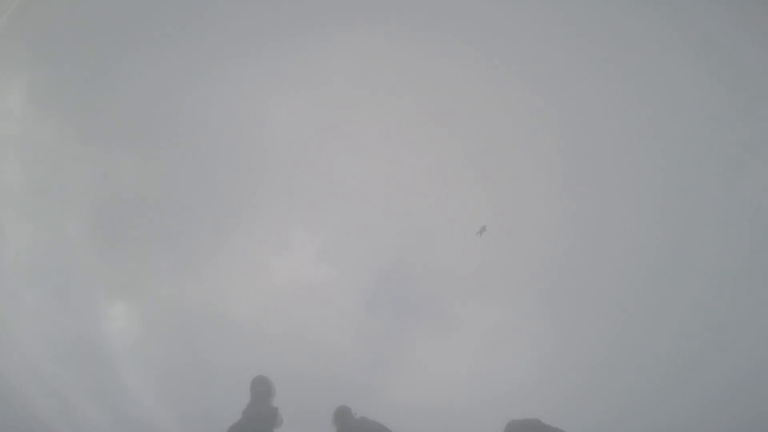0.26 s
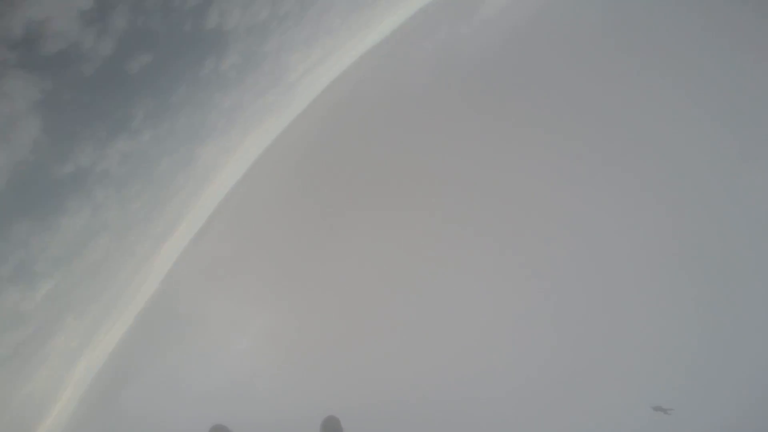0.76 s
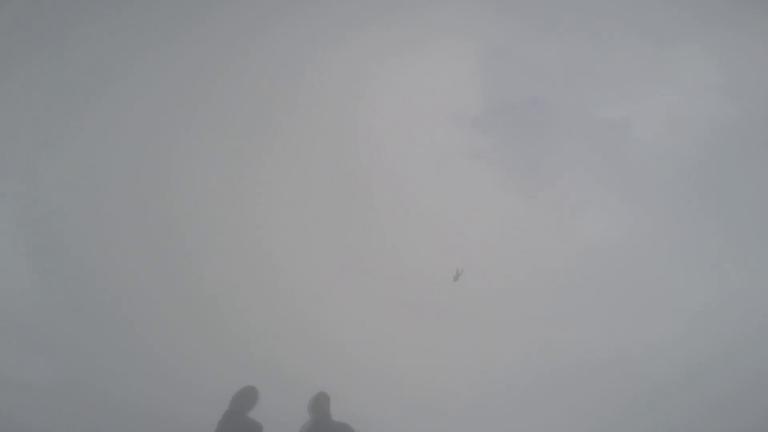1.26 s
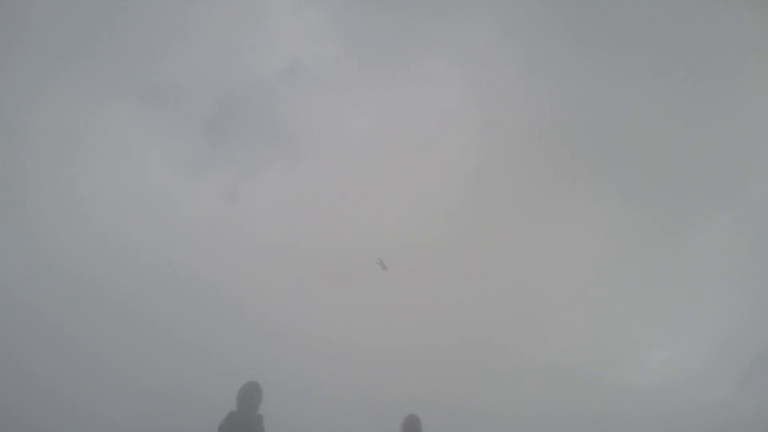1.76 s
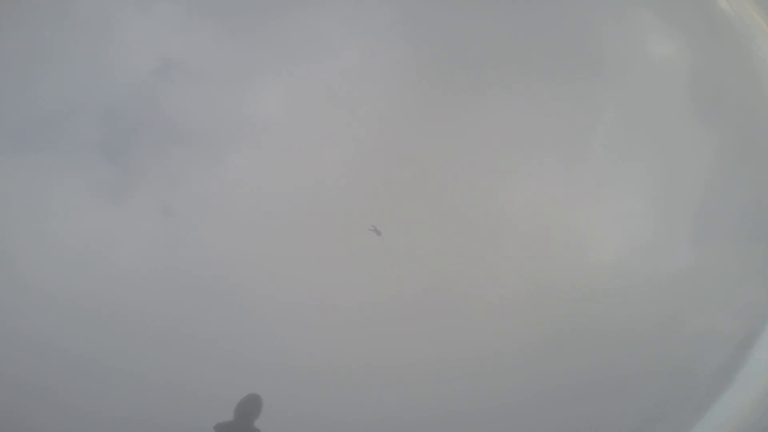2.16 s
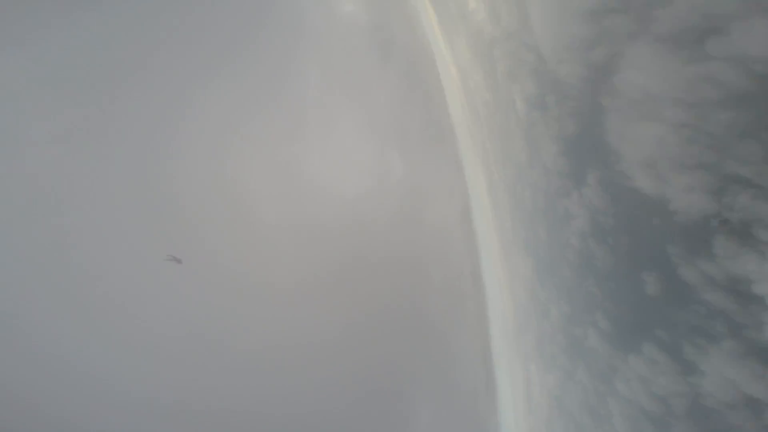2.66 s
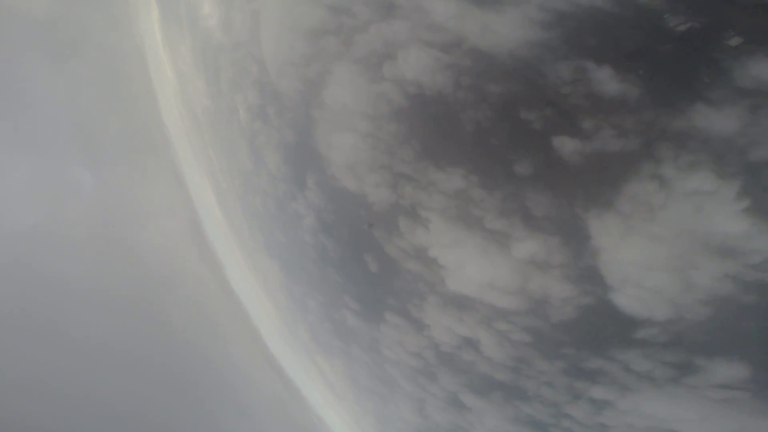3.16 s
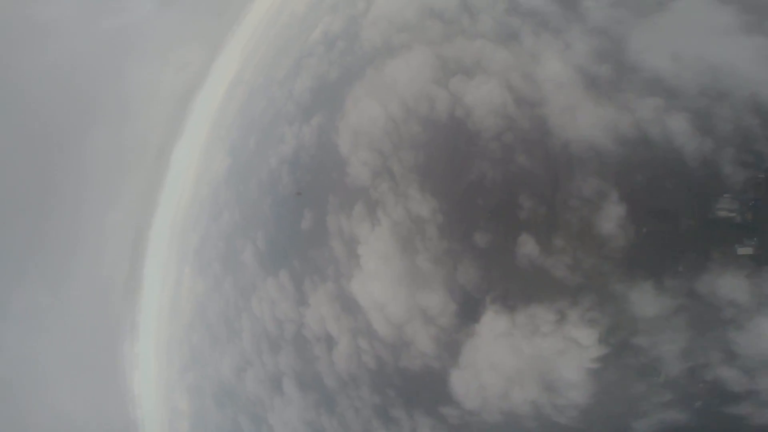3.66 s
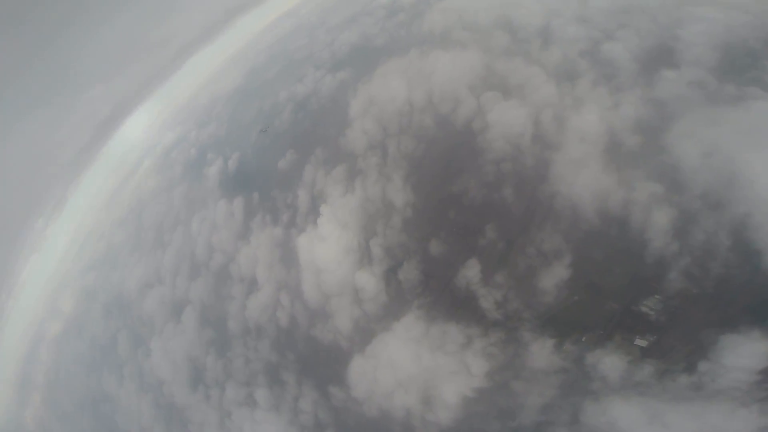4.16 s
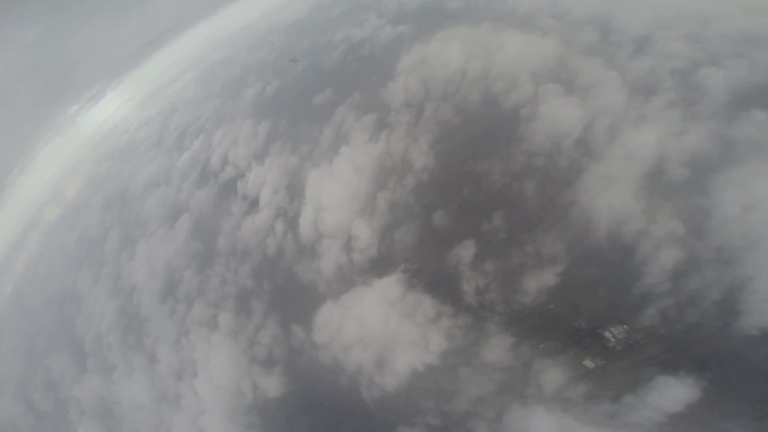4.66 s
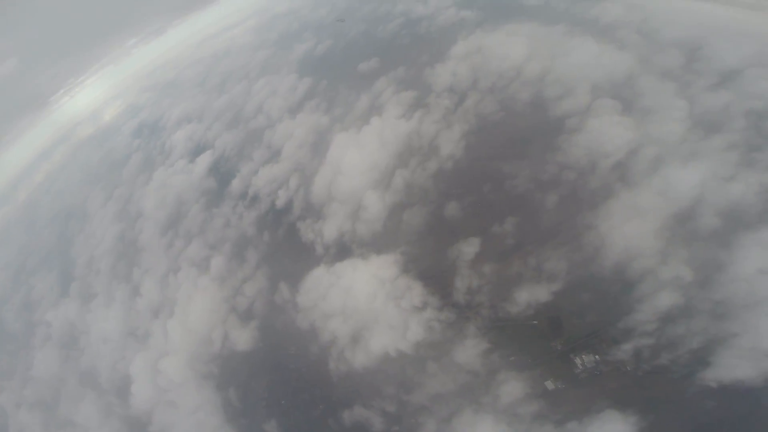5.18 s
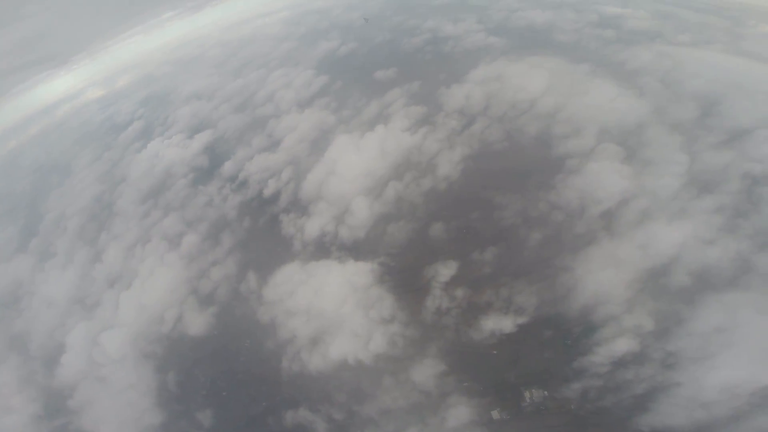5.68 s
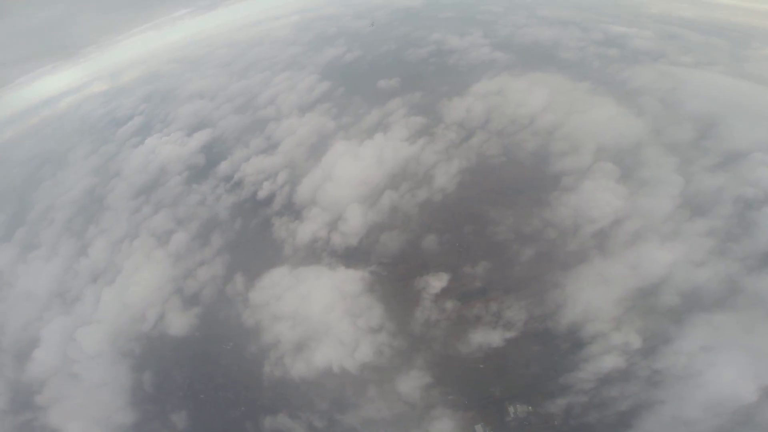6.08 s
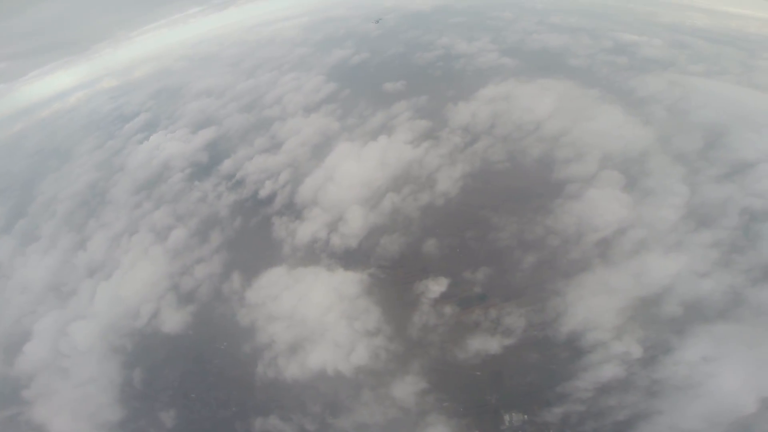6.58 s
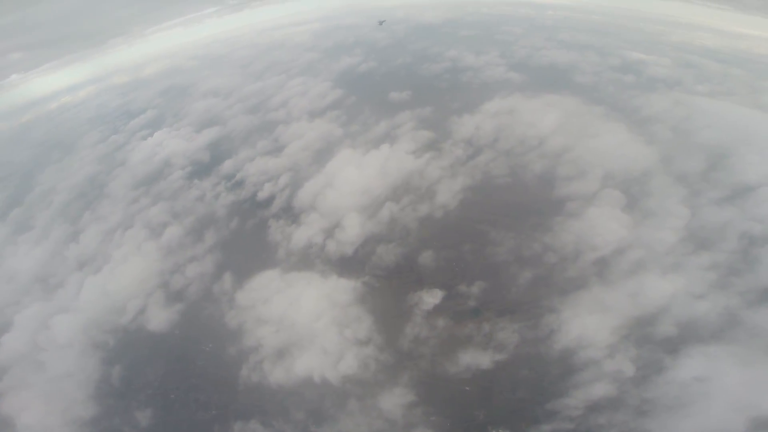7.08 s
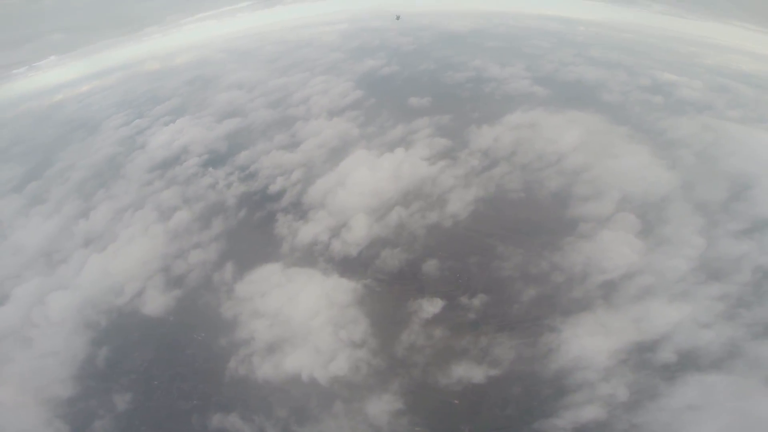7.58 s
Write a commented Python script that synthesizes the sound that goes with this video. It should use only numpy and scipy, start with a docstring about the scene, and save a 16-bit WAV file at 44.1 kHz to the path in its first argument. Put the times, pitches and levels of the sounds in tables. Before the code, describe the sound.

Continuous loud freefall wind, very close and with no echo, the same in both channels. Low eddies buffet the camera housing while the air rings hoarsely around its edges and hisses in short spurts. A thin, wavering whistle flickers early on. A mid-pitched roar surges during a roll, followed by scattered thumps and finally an even, full rush of air.

```python
"""Freefall on a helmet

Wind heard by one microphone in a camera housing on a skydiver's helmet, all of it shaped noise but for
the whistles. Eddies buffet the housing and the airstream rings the gaps at its edges; as the diver rolls
over, a roar sweeps past and a slit whistles faintly, in wavering sine tones. In the stable fall the flow
settles into one broad, even rush of overlapping resonances."""
import sys
import numpy as np
from scipy import signal
from scipy.fft import rfft, irfft, next_fast_len
from scipy.io import wavfile

SR = 44100
rng = np.random.default_rng(int(sys.argv[2]) if len(sys.argv) > 2 else 0)


def to_wav(sig):
    """Store sig (one row per channel, or 1-D mono) as 16-bit WAV at the path in sys.argv[1].

    Samples outside -1..1 are clipped; the rate is SR.
    """
    pcm = np.clip(np.atleast_2d(sig), -1, 1) * 32767
    pcm = np.round(pcm).astype(np.int16)
    wavfile.write(sys.argv[1], SR, pcm.T)  # frames by channels


N = 345289


def undb(db):
    """Decibels to gain."""
    return 10 ** (np.asarray(db) / 20)


def noise(response):
    """Noise of rms 1 with the given amplitude response, a function of frequency."""
    size = next_fast_len(N, real=True)
    hz = np.maximum(np.arange(size // 2 + 1) * SR / size, 1)
    spectrum = rfft(rng.standard_normal(size)) * response(hz)
    x = irfft(spectrum, size)[:N]
    return x / np.std(x)


def turbulence(spectrum):
    """Random pressure with a smooth spectrum that dies away above its last point."""
    f, db = np.transpose(spectrum)

    def response(hz):
        smooth = undb(np.interp(np.log(hz), np.log(f), db))
        return smooth * np.minimum(f[-1] / hz, 1) ** 2
    return noise(response)


def cavities(modes):
    """Air cavities, each blown by its own eddies, so that their powers add."""
    def response(hz):
        power = 0
        for f, width, db in modes:
            detuning = (hz / f - f / hz) * f / (2 * width)
            power = power + (undb(db) / (1 + 2 * detuning ** 2)) ** 2
        return np.sqrt(power)
    return noise(response)


def flutter(rate_hz, depth_db):
    """A gain that wanders at random, mostly slower than the given rate, by an rms depth in dB."""
    return undb(depth_db * noise(lambda hz: 1 / (1 + (hz / rate_hz) ** 4)))


def curves(table):
    """The columns of a curve at every sample."""
    s, *columns = np.transpose(table)
    return [np.interp(np.arange(N) / SR, s, c) for c in columns]


def arch(start, length):
    """Half a sine that rises from 0 to 1 and falls back over one event."""
    progress = (np.arange(N) / SR - start) / length
    on, out = (progress > 0) & (progress < 1), np.zeros(N)
    out[on] = np.sin(np.pi * progress[on])
    return out


def surging(steady_db, events):
    """Gain of a steady level with surges on top that set in, hold and die; their powers add."""
    attack_s, release_s = 0.047, 0.084
    t, power = np.arange(N) / SR, undb(steady_db) ** 2
    for start, length, db in events:
        onset = (t - start) / attack_s
        decay = (start + length - t) / release_s
        power = power + undb(db) ** 2 * np.clip(np.minimum(onset, decay), 0, 1)
    return np.sqrt(power)


def rush(edge, stream):
    """Slanting flow rings the edge gaps; head-on flow gives one broad resonance."""
    # resonances of the edge gaps, then of the smooth stream: centre_hz, width_hz, relative level_db
    gap_modes = [(1467, 210, 0), (2213, 710, 0), (2672, 340, 1.5), (3386, 344, -1), (4000, 870, -11)]
    stream_modes = [(1476, 770, -5.5), (1950, 600, -0.5), (2206, 250, 3), (2850, 660, -4),
                    (3350, 400, -15.5), (3920, 300, -8.5), (4570, 900, -20), (6060, 1400, -15),
                    (7200, 700, -31)]
    gaps = undb(edge) * cavities(gap_modes) * flutter(rate_hz=140, depth_db=0.75)
    smooth = undb(stream) * cavities(stream_modes) * flutter(rate_hz=34, depth_db=0.45)
    return gaps + smooth


def roar(churn, stream):
    """Separated flow roars, most of all while the diver rolls through the airstream."""
    # spectrum of the separated flow: frequency_hz, relative level_db per Hz
    roar_spectrum = [(250, -30), (420, -4), (600, -2), (800, 0.5), (1050, 0.5), (1280, 3), (1550, 5.5),
                     (1850, -4.5), (3000, -24)]
    # the flow tears off the face of the housing, mostly during the roll: start_s, length_s, level_db
    breakaways = [(1.29, 0.25, -36), (2.9, 0.38, -23.5), (3.204, 0.417, -19.5)]
    torn = surging(churn - 32.5, breakaways)  # steady level in dB at 0 dB churn
    head_on = undb(stream + churn - 17.5)  # dB relative to the smooth stream at 0 dB churn
    separation = np.hypot(torn, head_on)
    return separation * turbulence(roar_spectrum) * flutter(rate_hz=93, depth_db=1.07)


def buffeting(large, small):
    """Large eddies thump the housing over a deep rumble; the body's wake adds smaller, choppier ones."""
    # spectra of the rumble, the thumps and the wake: frequency_hz, relative level_db per Hz
    rumble_spectrum = [(12, -8), (25, 1), (50, 3), (80, 0.5), (130, -8)]
    thump_spectrum = [(12, -32), (25, -25), (50, -25), (70, -7.5), (95, -6), (122, 1), (155, -6),
                      (200, -16.5), (300, -32), (600, -38)]
    wake_spectrum = [(70, -36), (130, -3.5), (190, 1.5), (260, -1.5), (350, -4.5), (500, -8), (750, -16),
                     (1500, -27)]
    # large eddies strike the housing: start_s, length_s, level_db
    strikes = [(0, .16, -23), (.15, 0.14, -16), (0.264, 0.12, -22), (.555, .08, -21.5), (0.657, 0.14, -27),
               (.85, 0.34, -24), (1.245, 0.096, -18.5), (2.006, 0.47, -25), (2.74, 0.3, -27.5),
               (4.137, 0.11, -19.5), (4.41, 0.18, -29), (4.595, 0.12, -18), (4.746, 0.14, -21),
               (5.723, 0.12, -22), (5.857, 0.072, -22), (6.46, .09, -25), (6.693, .09, -23)]
    # the helmet swings through the body's wake: start_s, length_s, level_db
    wake_passes = [(0, .2, -27), (0.787, 0.12, -31.5), (0.936, .16, -30), (1.26, .14, -33),
                   (2, 0.32, -23.5), (2.243, 0.49, -25)]
    rumble_db, thump_db, wake_db = -36, -27, -30.5  # steady levels in turbulence of 0 dB
    rumble = undb(rumble_db + .5 * large) * turbulence(rumble_spectrum)
    thumps = surging(thump_db + large, strikes) * turbulence(thump_spectrum)
    thumps *= flutter(rate_hz=14, depth_db=0.7)
    chop = surging(wake_db + small, wake_passes) * turbulence(wake_spectrum)
    chop *= flutter(rate_hz=36, depth_db=1.3)
    return rumble + thumps + chop


def port(ring, hiss):
    """The finest eddies ring the microphone port and hiss in quick spurts."""
    # resonances of the port: centre_hz, width_hz, relative level_db
    port_modes = [(5817, 610, 1.5), (7310, 330, -8), (8650, 450, -17), (10000, 570, -24)]
    # spectrum of the hiss: frequency_hz, relative level_db per Hz
    hiss_spectrum = [(2500, 3.5), (4200, 2.5), (5200, 3.5), (6800, -5.5), (8000, 1), (10000, 0.5),
                     (11500, -2), (13000, -5.5), (15200, -13.5)]
    # air skims straight across the port in a spurt of hiss: start_s, length_s, level_db
    spurts = [(0.517, 0.15, -29.5), (1.167, 0.22, -29.5), (2.74, 0.65, -30.5)]
    ringing = undb(ring) * cavities(port_modes) * flutter(rate_hz=19, depth_db=0.05)
    hissing = surging(hiss, spurts) * turbulence(hiss_spectrum) * flutter(rate_hz=240, depth_db=0.9)
    return ringing + hissing


def swells():
    """Cavities that catch the flow rise out of the rush, resonate hoarsely and sink back."""
    # the flow locks on to one cavity for a moment: start_s, length_s, centre_hz, width_hz, peak level_db
    lock_ons = [(0, 0.11, 670, 300, -28), (0, 0.16, 5700, 400, -26.5), (0.12, 0.14, 145, 59.6, -15),
                (0.126, 0.11, 65, 45, -15.5), (0.193, 0.17, 1520, 260, -22), (.28, 0.3, 2660, 220, -29),
                (0.433, 0.11, 5750, 450, -21), (.44, .16, 3400, 300, -31), (0.778, 0.19, 1510, 220, -27),
                (.76, 0.44, 203, 70, -29.5), (1.217, 0.096, 5770, 500, -20.5),
                (1.297, 0.21, 2540, 260, -20.5), (2.057, 0.72, 183, 99, -19), (2.61, .16, 5850, 565, -30),
                (2.75, 0.083, 5740, 500, -20), (2.755, .12, 3520, 330, -20.5),
                (2.824, 0.25, 4800, 1700, -23.5), (2.83, 0.28, 2640, 240, -24),
                (3.222, 0.42, 1170, 330, -26), (3.323, 0.2, 1520, 378, -19.5), (3.35, .07, 5660, 500, -24),
                (3.48, 0.5, 3400, 240, -23), (3.5, 0.32, 2660, 240, -27.5), (3.6, .75, 10000, 600, -45),
                (4.346, 0.57, 510, 160, -35), (4.778, 0.37, 1870, 350, -20), (5.042, 0.28, 2150, 130, -19),
                (5.55, 0.95, 1130, 300, -32), (6, 2, 2230, 170, -29), (7.1, 0.78, 2200, 170, -25)]
    out = np.zeros(N)
    for start, length, hz, width, db in lock_ons:
        out += undb(db) * np.sqrt(arch(start, length)) * cavities([(hz, width, 0)])
    return out


def whistles():
    """A narrow slit sounds short, broken edge tones when the air hits it at the right angle."""
    # edge tones: start_s, length_s, start_hz, end_hz (both before the waver), relative level_db
    slit_tones = [(.57, 0.044, 11750, 11600, -40), (.585, .04, 12800, 12730, -42),
                  (1.382, .1, 13280, 13350, -38), (1.55, .07, 13450, 13700, -40),
                  (1.63, .06, 13700, 13500, -35), (1.72, .12, 13650, 13450, -39),
                  (1.72, .09, 12300, 12400, -45), (1.8, 0.14, 14760, 14470, -37.5),
                  (1.915, .06, 13300, 13350, -34), (1.465, .07, 13500, 13650, -44)]
    t, out = np.arange(N) / SR, np.zeros(N)
    waver = noise(lambda hz: 1 / (1 + (hz / 450) ** 2))
    for start, length, start_hz, end_hz, db in slit_tones:
        on = (t >= start) & (t < start + length)
        progress = (t[on] - start) / length
        glide_hz = start_hz + (end_hz - start_hz) * progress
        hz = glide_hz * (1 + .011 * waver[on])
        swell = np.sqrt(2 * np.abs(np.sin(np.pi * progress)))
        out[on] += undb(db) * swell * np.sin(2 * np.pi * np.cumsum(hz) / SR)
    return out * flutter(rate_hz=70, depth_db=2.5) * undb(1.5)  # all tones lifted by 1.5 dB


def pressure():
    """Push of the air on the housing in dB: up in gusts, down in lulls."""
    # gusts press harder on the housing: start_s, length_s, rise_db
    gusts = [(.05, 0.12, 0.5), (.28, .12, 1), (.495, 0.05, 3.5), (.565, 0.04, 1.5), (1.206, 0.24, 3.2),
             (1.552, 0.13, 1), (3.524, 0.22, 2), (3.792, .07, 0.5), (4.22, 0.089, 2.5), (5.07, 0.098, 0)]
    # the housing slips into sheltered air: start_s, length_s, drop_db
    lulls = [(.14, 0.16, 3.5), (.395, 0.024, 2.5), (.597, .165, 6.5), (0.93, .04, 2.5), (1.48, 0.06, 3),
             (1.664, .06, 3), (2.358, 0.18, 2), (3.406, 0.085, 4.5), (3.725, 0.051, 4), (3.865, 0.15, 1),
             (4.306, .06, 2), (5.15, .065, 1.5)]
    rises = sum(db * arch(start, length) for start, length, db in gusts)
    drops = sum(db * arch(start, length) for start, length, db in lulls)
    return rises - drops


def scene():
    """Attitude sets the colour, gusts and lulls move the flow layers; one microphone feeds both channels."""
    # how the flow meets the housing as the diver turns, before gusts and lulls:
    # time_s, edge gaps level_db, smooth stream level_db, port ring level_db, hiss level_db
    attitude = [(0, -21.5, -23.5, -24, -31.5), (.26, -18.5, -39, -28, -37), (.72, -19.5, -35, -29.5, -32),
                (1.08, -20.5, -32, -29, -30), (1.5, -16, -37, -25.5, -27), (1.85, -19.5, -23.5, -29, -31.5),
                (2.5, -19.5, -29, -28.5, -32.5), (2.82, -20.5, -43, -24.5, -32),
                (2.98, -17.7, -24, -25, -28.5), (3.33, -17.5, -32, -23.5, -28),
                (3.7, -17.5, -21.5, -25, -32), (4.2, -16.5, -28.5, -25, -32), (4.65, -18, -19, -23.5, -33),
                (5.1, -19.5, -19, -27, -32), (5.5, -20, -18.5, -24, -32), (6, -21.5, -16.5, -27.5, -30.5),
                (7, -23.5, -15.5, -29, -31), (7.83, -22.5, -16, -29.5, -31)]
    # strength of the turbulence shed by helmet and body, before gusts and lulls:
    # time_s, large eddies level_db, small eddies level_db
    shedding = [(0, 8, -3), (.35, -1, 1.5), (.78, -1.5, -2.5), (1.1, -0.5, -4), (1.5, -1, 3.5),
                (1.9, 0.5, 2.5), (2.4, 4, 3), (2.8, 0, -0.5), (3.15, -1.5, -0.5), (3.72, -7, -7),
                (4.05, -1.5, -2), (4.5, 2.5, 1), (5.03, -0.5, -3), (5.8, 2, 1.5), (6.55, -1, -1.5),
                (7.83, -2.5, -2.5)]
    # share of a gust or lull (in dB) that reaches each layer
    port_share, hiss_share, churn_share = 0.77, 0.52, 0.9
    edge, stream, ring, hiss = curves(attitude)
    push = pressure()
    large, small = curves(shedding) + churn_share * push
    higher = rush(edge + push, stream + push) + roar(small, stream)
    higher += port(ring + port_share * push, hiss + hiss_share * push) + swells()
    # fine turbulence shakes the higher layers together
    shake = flutter(rate_hz=21, depth_db=0.33) * flutter(rate_hz=130, depth_db=0.54)
    air = buffeting(large, small) + shake * higher + whistles()
    return np.array([air, air])


def record(dry):
    """The camera rounds the highest peaks and cuts the top."""
    top_hz = 15300
    rounded = np.tanh(.5 * dry) / .5
    top_cut = signal.ellip(10, .1, 80, top_hz, fs=SR, output="sos")
    return signal.sosfilt(top_cut, rounded)


dry = scene()
out = record(dry)
to_wav(out)
```